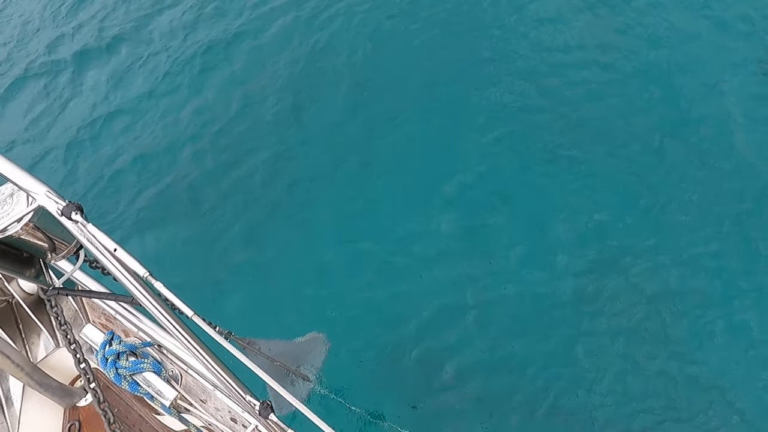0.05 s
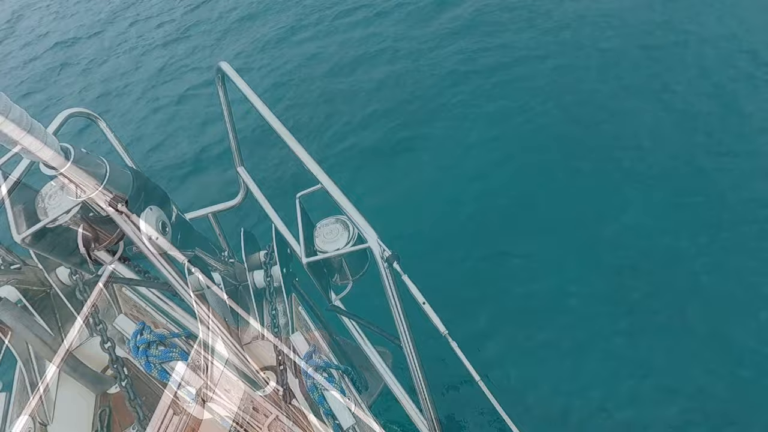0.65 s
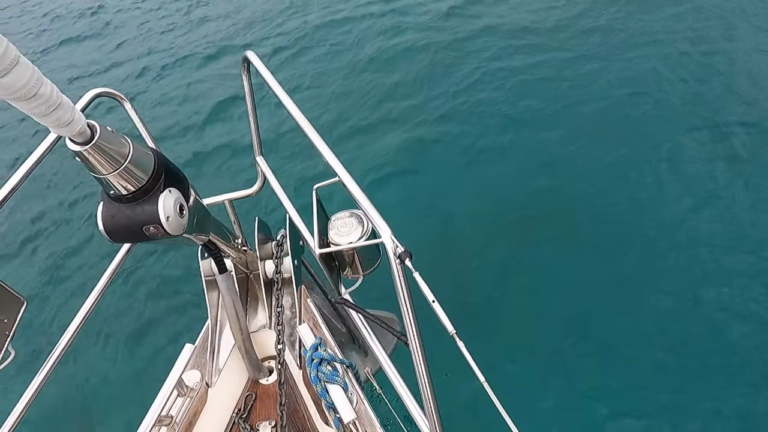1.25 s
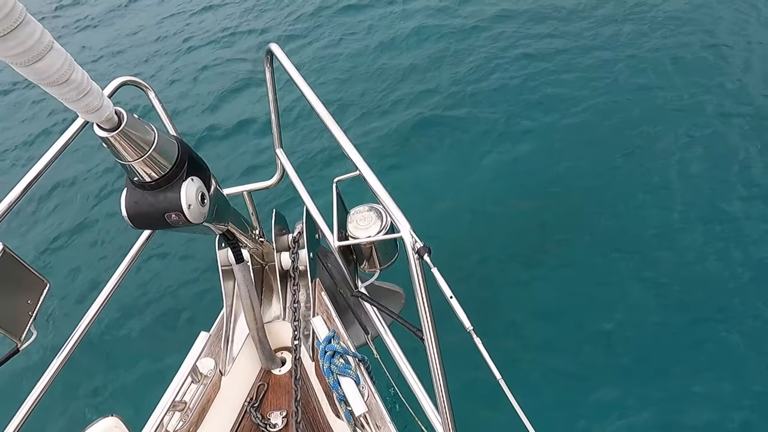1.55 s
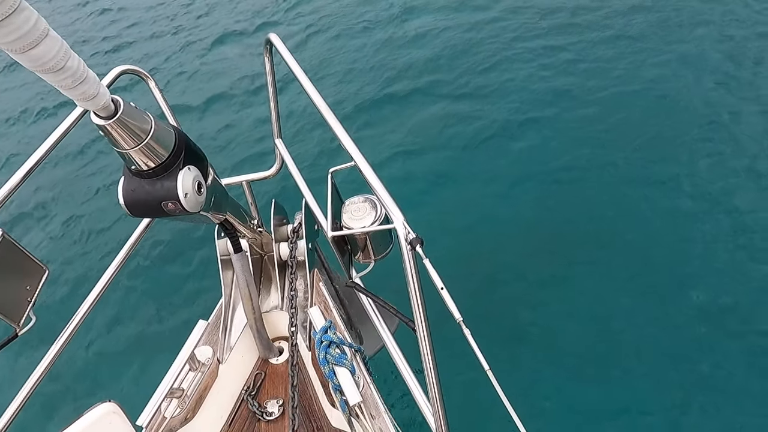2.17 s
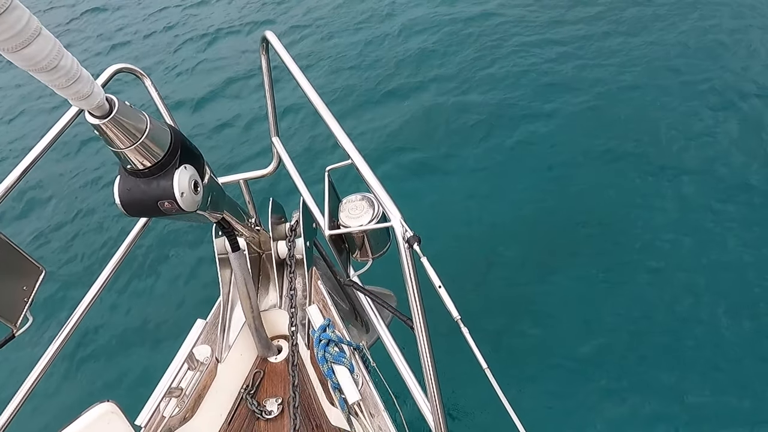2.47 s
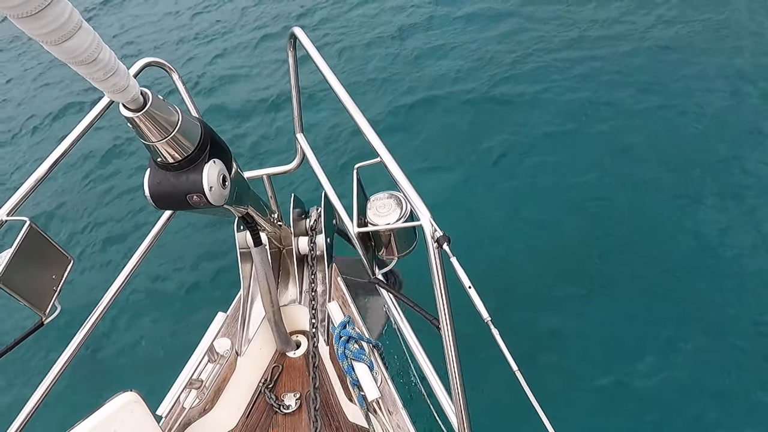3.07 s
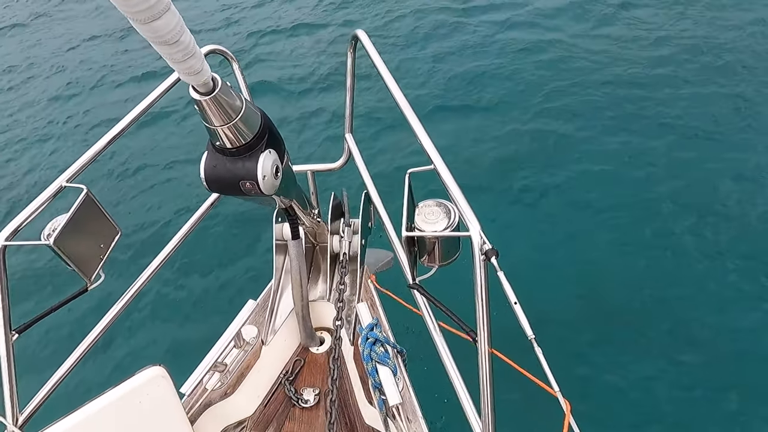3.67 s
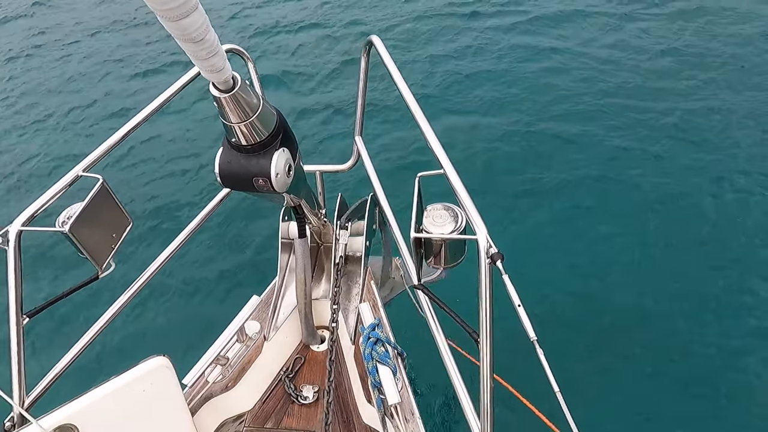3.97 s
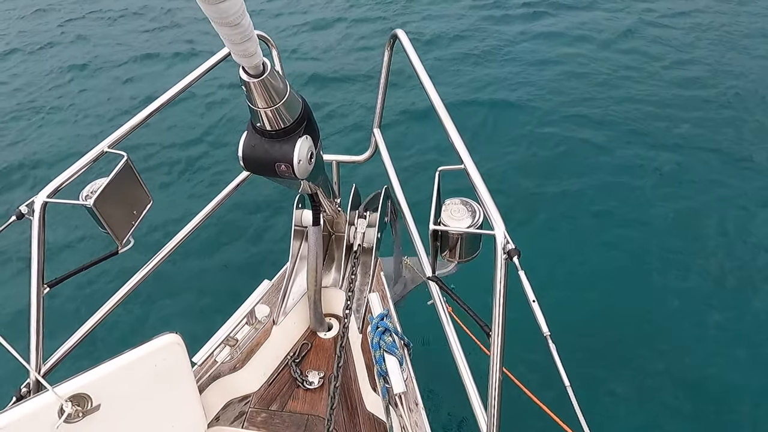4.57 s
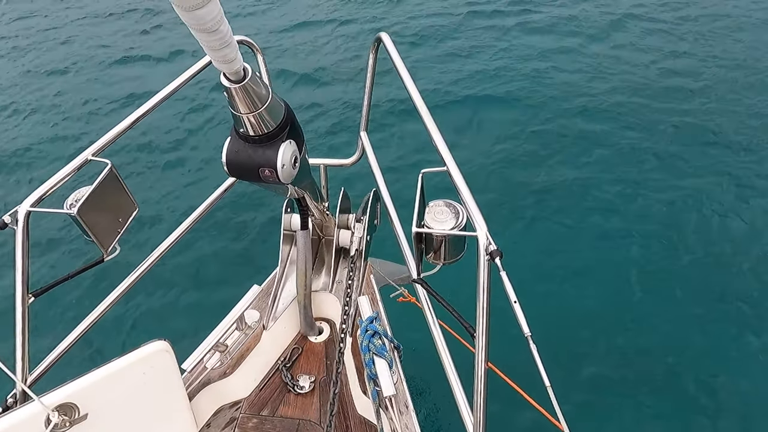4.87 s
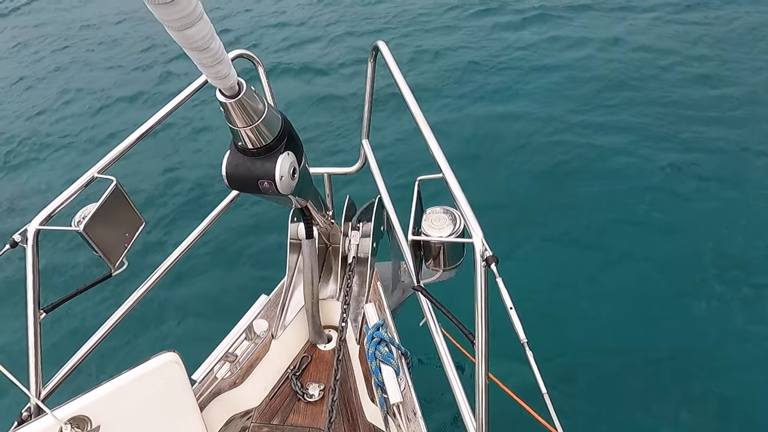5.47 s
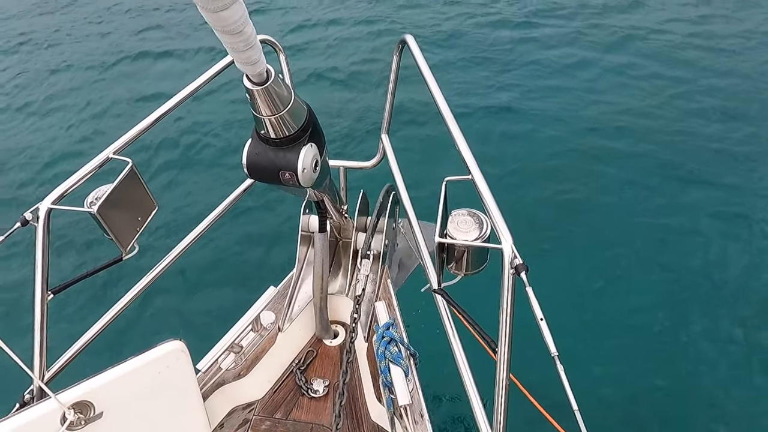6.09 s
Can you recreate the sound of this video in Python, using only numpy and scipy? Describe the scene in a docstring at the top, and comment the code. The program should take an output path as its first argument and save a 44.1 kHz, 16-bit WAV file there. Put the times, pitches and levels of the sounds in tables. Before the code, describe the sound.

An electric winch on a sailboat hauls up anchor chain in three pulls, heard close up outdoors. The first is a steady grinding rattle over a low hum, ending in ringing knocks. The second starts with a brief whine and brings loud steel clanks, a scrape and a hollow boom. The third is lighter clinking with a final knock. Gentle wind on the microphone, water and a few drips and squeaks fill the gaps.

```python
"""A chain rattles and clinks over a yacht's bow roller as an electric winch hauls it up in three pulls.
The motor hums, and whines when it restarts. Steel links grind and knock against each other.
The anchor swings, rings like a bell and clunks into its steel fitting, and the hollow deck booms.
Wind, rippling water and a few drips and squeaks fill the pauses."""
import sys
import numpy as np
from scipy import signal
from scipy.fft import rfft, irfft, next_fast_len
from scipy.io import wavfile

SR = 44100
rng = np.random.default_rng(int(sys.argv[2]) if len(sys.argv) > 2 else 0)


def digitize_waveform(pressure):
    """Quantize a signal to 16-bit integers and store it at the path in sys.argv[1].

    Rows of a 2-D input are taken as channels; values are limited to [-1, 1].
    """
    field = np.atleast_2d(pressure).T
    bounded = np.clip(field, -1, 1)
    quanta = np.round(bounded * 32767).astype(np.int16)
    wavfile.write(sys.argv[1], SR, quanta)


N = 279285
TIME = np.arange(N) / SR


def from_db(db):
    """Turn decibels into a gain."""
    return 10 ** (np.asarray(db) / 20)


def unit_power(x):
    """Scale a signal to an average power of 1."""
    return x / np.sqrt(np.mean(x ** 2) + 1e-20)


def in_time(rows):
    """Join rows that start with a time by straight lines, one curve for each further column."""
    s, *columns = np.transpose(rows)
    return [np.interp(TIME, s, column) for column in columns]


def drift(per_s):
    """A random wobble of about size 1 that turns per_s times a second."""
    knots = rng.standard_normal(N // 20)
    return unit_power(np.interp(TIME * per_s, np.arange(len(knots)), knots))


def cut(x, order, hz, kind):
    """Keep the "low" or the "high" pitches, or remove a band with "bandstop"."""
    return signal.sosfilt(signal.butter(order, hz, kind, fs=SR, output="sos"), x)


def colour(x, spectrum):
    """Give a sound the tone of a spectrum table; white noise keeps its power."""
    size = 2 * next_fast_len(N // 2 + SR // 10)
    hz, db = np.transpose(spectrum)
    log_hz = np.log(np.fft.rfftfreq(size, 1 / SR) + 1)
    gain = unit_power(from_db(np.interp(log_hz, np.log(hz), db)))
    # minimum phase: nothing sounds ahead of the hit that causes it
    cepstrum = irfft(np.log(gain))
    cepstrum[1:size // 2] *= 2
    cepstrum[size // 2 + 1:] = 0
    return irfft(rfft(x, size) * np.exp(rfft(cepstrum)))[:N]


def taps(times, db):
    """One click for each contact."""
    out = np.zeros(N)
    out[np.clip(np.round(times * SR).astype(int), 0, N - 1)] = from_db(db)
    return out


def grains(per_s, spread_db):
    """Tiny clicks at random times and of uneven strength."""
    sizes = from_db(spread_db * np.minimum(rng.exponential(1, N), 3)) * rng.choice([-1, 1], N)
    return unit_power(sizes * (rng.random(N) < per_s / SR))


def ring(force, modes):
    """A struck body rings at its own pitches (modes); each fades 60 dB in its ring time, t60."""
    out = np.zeros(N)
    for k, (hz, db, t60) in enumerate(modes):
        decay, angle = from_db(-60 / (t60 * SR)), 2 * np.pi * hz / SR
        feedback = [1, -2 * decay * np.cos(angle), decay * decay]
        out += (-1) ** k * from_db(db) * signal.lfilter([0, np.sin(angle)], feedback, force + 1e-18)
    return out


def ring_anywhere(force, modes, spot_db=5):
    """Each contact lands on another spot, which favours other modes."""
    return sum((-1) ** k * ring(force * from_db(spot_db * drift(25).clip(-2, 2)), [mode])
               for k, mode in enumerate(modes))


def burst(clicks, crack_t60, tail_t60, tail_db):
    """Countless crowded modes blur into noise: a short crack and a longer tail after each click."""
    def fade(t60):
        return signal.lfilter([1], [1, -from_db(-120 / (t60 * SR))], clicks ** 2 + 1e-18)
    power = fade(crack_t60) + from_db(tail_db) ** 2 * fade(tail_t60)
    return np.sqrt(power) * rng.standard_normal(N)


# The tone of the ripples. Each row: frequency in Hz, relative level in dB.
RIPPLE_SPECTRUM = [(300, 7), (1500, -3), (3000, -10), (7000, -27.5), (10000, -54)]
# Water along the hull. Each row: time in seconds, level in dB.
WASH = [(1.7, -50), (2.7, -48), (4.4, -55), (5.5, -50.5)]


def water():
    """Countless tiny ripples merge into a soft wash."""
    wash_db, = in_time(WASH)
    level = from_db(wash_db + 0.37 * drift(10))
    return level * colour(grains(per_s=9000, spread_db=4), RIPPLE_SPECTRUM)


# The tone of the wind. Each row: frequency in Hz, relative level in dB.
WIND_SPECTRUM = [(20, -23.5), (55, 0), (90, -2.5), (190, -1), (350, -9), (640, -18.5), (1000, -36.5),
                 (3000, -78)]
# Gusts on top of the breeze. Each row: middle in seconds, half-width in seconds, boost in dB.
GUSTS = [(1.7, 0.35, 7.5), (2.68, 0.16, 9), (3.899, 0.19, 6.5), (5.48, 0.52, 7.5), (6.1, 0.18, 5.5)]


def wind(breeze_db=-41, arrives_s=1.44, rise_s=0.39):
    """A breeze picks up and buffets the microphone in lumps and gusts."""
    gust_db = sum(db * np.exp(-((TIME - s) / width_s) ** 2) for s, width_s, db in GUSTS)
    picked_up = .5 + .5 * np.tanh((TIME - arrives_s) / rise_s)
    lumps_db = 2 * drift(30)
    rush = colour(rng.standard_normal(N), WIND_SPECTRUM)
    return picked_up * from_db(breeze_db + gust_db + lumps_db) * rush


# Drips off the anchor and small squeaks. Each row: start in seconds, level in dB,
# first pitch in Hz, glide in Hz per second, ring time in seconds.
PLINKS = [(1.669, -28.5, 1180, 54987, 0.028), (1.826, -44, 12000, 1, 0.029),
          (1.878, -16, 3250, 3012, 0.009), (4.472, -38.5, 2140, 2506, 0.14),
          (4.535, -24.5, 2780, 499, 0.043), (5.789, -19.5, 9250, -2000, 0.034)]


def drips_and_squeaks():
    """Short gliding tones, a little unsteady, that swell quickly and die away."""
    waver = 1 + .02 * drift(500)
    out = np.zeros(N)
    for s, db, hz, glide, t60 in PLINKS:
        age = np.clip(TIME - s, 0, .5)
        phase = 2 * np.pi * np.cumsum((hz + glide * age) * waver) / SR
        attack = 1 - np.exp(-age / .005)
        out += attack * from_db(db - 60 * age / t60) * np.sin(phase)
    return out


# The motor's hum. Each row: time in seconds, pitch in Hz, level in dB.
HUM = [(0, 84, -37), (.28, 88.5, -36.5), (.7, 84.4, -39), (1.3, 85, -58)]


def motor_hum():
    """The motor hums low under load, wavering in level and pitch."""
    hz, db = in_time(HUM)
    level = np.sqrt(2) * from_db(db + 1.6 * drift(14))
    return level * np.sin(2 * np.pi * np.cumsum(hz + drift(8.8)) / SR)


# The motor spinning up. Each row: start in seconds, peak level in dB.
MOTOR_STARTS = [(3.004, -20), (5.756, -23.5)]


def gear_whine(top_hz=1470, rise_s=0.047, loudest_s=0.042):
    """The gears' whine climbs towards full speed until the chain takes up the load."""
    out = np.zeros(N)
    for s, db in MOTOR_STARTS:
        age = np.maximum(TIME - s, 0)
        hz = top_hz * (1 - np.exp(-age / rise_s)) * (1 + 0.092 * drift(300))
        swell = (age / loudest_s) ** 2
        out += from_db(db) * swell * np.exp(1 - swell) * np.sin(2 * np.pi * np.cumsum(hz) / SR)
    return out


# A side plate of the roller. Each row: pitch in Hz, relative level in dB, ring time in seconds.
PLATE_MODES = [(2050, -2, 0.26), (2160, -13, .36)]
# The anchor's shank (its long bar) dragging. Each row: start and stop in seconds, level in dB.
DRAGS = [(3.15, 3.358, -32), (3.474, 3.673, -21.5)]


def singing_plate():
    """The shank rubs over the roller and makes a side plate sing."""
    out = np.zeros(N)
    for start, stop, db in DRAGS:
        friction = grains(per_s=570, spread_db=-2.0) * (TIME > start) * (TIME < stop)
        for hz, mode_db, t60 in PLATE_MODES:
            tone = ring(friction, [(hz, 0, t60)])
            out += from_db(db + mode_db) * tone / np.abs(tone).max()
    return out


# The steel bow fitting. Each row: pitch in Hz, relative level in dB, ring time in seconds.
FITTING_MODES = [(1270, -9, 0.6), (1523, -7, 0.55), (1674, -10.5, 0.7), (1922, -4, 0.38), (1960, 3, 0.24),
                 (2008, -1, 0.35), (2396, -6, .34), (2541, -10, 0.58), (2682, -5, 0.33), (2918, -8, 0.3),
                 (3790, -12, 0.22), (4000, -13, .28), (4134, -12, 0.26), (4436, -14, .23)]


def bow_fitting(force, seated_s=2, chain_only_db=-8):
    """The fitting rings when knocked, more softly until the shank rests on it."""
    contact = from_db(np.where(TIME > seated_s, 0, chain_only_db))
    return from_db(-15.5) * ring(contact * force, FITTING_MODES)


# The anchor. Each row: pitch in Hz, relative level in dB, ring time in seconds.
ANCHOR_MODES = [(1190, 0, 0.8), (1316, -1, 0.42), (1690, -9, 0.35), (2541, -8, 0.5), (3012, -8, 0.42),
                (4145, -19, 0.9), (4732, -22, .45)]
# Blows on the anchor. Each row: start in seconds, level in dB, pitch in Hz above which little rings.
TOLLS = [(0.984, -28, 2800), (1.0174, -20.5, 5000), (1.2992, -24.5, 5100), (2.0842, -39.5, 2930)]


def anchor_tolls():
    """The hanging anchor rings like a bell; a soft blow leaves its high modes still."""
    out = np.zeros(N)
    for s, db, top_hz in TOLLS:
        modes = [(hz, mode_db - 10 * np.log10(1 + (hz / top_hz) ** 10), t60)
                 for hz, mode_db, t60 in ANCHOR_MODES]
        out += ring(taps(np.array([s]), db), modes)
    return out


# The tones of a bright snap, a clack and a low thud. Each row: frequency in Hz, relative level in dB.
SNAP_SPECTRUM = [(800, -14), (2000, 6.5), (4000, 3.5), (5500, -3.5), (7500, -17), (10200, -32.5),
                 (12000, -36.5), (15000, -63)]
CLACK_SPECTRUM = [(150, -20.5), (500, -2.5), (950, 7), (2000, 0), (3000, -8), (5000, -28), (9000, -64)]
THUD_SPECTRUM = [(40, -40), (100, -11), (170, 2.5), (380, 6), (550, -4), (900, -7.5), (2000, -53.5),
                 (6000, -81.5)]
# Three hollow bodies. Each row: pitch in Hz, relative level in dB, ring time in seconds.
DECK_MODES = [(181.6, 2.4, 0.28), (250.3, 4, 0.21), (377.6, 1.34, 0.086)]
ROLLER_MODES = [(294, -5, 0.18), (401.8, 1, 0.15), (482.4, -6.5, 0.24), (597.7, -0.5, 0.16),
                (660, 0.5, 0.16)]
HULL_MODES = [(142.1, -5.5, 0.29), (183.9, 0.5, 0.38), (241.8, -1, 0.25), (373, -24.5, 2.35)]
# The anchor's full weight landing. Each row: start in seconds, level in dB.
SLAMS = [(2.085, -24.5), (3.873, -9)]
# Anchor and taut chain hitting the fitting. Each row: start in seconds, level in dB,
# hardness (extra snap) in dB, weight (extra thud) in dB.
KNOCKS = [(1.2877, -21.5, -12, -4), (1.301, -13, -13, -1), (1.4405, -25, -6, -5), (1.8588, -31, -20, 0.5),
          (2.0831, -30.5, -11, 5.5), (2.999, -26.5, 5.5, -8), (3.074, -13, 0, 3), (3.1226, -20, 5.5, 8.5),
          (3.175, -11, -3.5, -12), (3.257, -15, 0.5, -19), (3.281, -16.5, 2.5, -27),
          (3.4755, -16, -5.5, -16), (3.6312, -18, 1.5, -5.5), (3.76, -33, 2, -16), (3.872, -15, -3.5, 5),
          (3.966, -22, -4.5, -12), (4.0662, -21.5, -6.5, -28.5), (4.534, -44, -3, -3.5),
          (4.9929, -23, -6, -6.5), (5.042, -20, -6, -9.5), (5.099, -27, -10.5, -12),
          (5.7369, -22.5, -18, -32), (5.8317, -18.5, -26, -8), (6.309, -16.5, -1.5, -6)]


def knocks(heavy_db=-22, rebound_s=.014, rebound_loss_db=8.5):
    """Heavy steel hits the fitting and the deck booms; returns the sound and the force on the steel."""
    s, db, hardness_db, weight_db = np.transpose(KNOCKS)
    thud_db = db + weight_db
    heavy = thud_db > heavy_db

    def bouncing(level):  # heavy blows bounce and strike once more
        return taps(s, level) + taps(s[heavy] + rebound_s, level[heavy] - rebound_loss_db)

    snap = burst(bouncing(db + hardness_db - 0.5), crack_t60=0.021, tail_t60=0.098, tail_db=-3.5)
    clack = burst(bouncing(db - 2), crack_t60=0.07, tail_t60=0.19, tail_db=-4)
    thud = burst(taps(s, thud_db - 3.5), crack_t60=0.28, tail_t60=0.59, tail_db=-4.5)
    impact = colour(snap, SNAP_SPECTRUM) + colour(clack, CLACK_SPECTRUM) + colour(thud, THUD_SPECTRUM)
    deck_boom = from_db(-8.5) * ring(taps(s, thud_db), DECK_MODES + ROLLER_MODES)
    hull_boom = ring(taps(*np.transpose(SLAMS)), HULL_MODES)
    # part of a blow's extra weight also goes into the steel
    force = taps(s, db + 0.35 * np.maximum(weight_db, 0))
    return impact + deck_boom + hull_boom, force


# Stretches of moving chain. Each row: start and stop in seconds, rattle level in dB,
# build-up time in seconds, seconds per link, extra deck rumble in dB.
RUNS = [(0, 1.189, -23, 0.00043, 0.12, 2.5), (2.987, 3.28, -18, 0.2, .15, 3),
        (3.425, 3.549, -24, 0.045, 0.16, 5.5), (3.755, 3.807, -34, .002, 0.16, 3),
        (5.729, 5.88, -34, 0.0064, 0.13, 8), (5.917, 6.336, -27, 0.0087, .175, -1)]
FIRST_LINK_S = 0.032  # from the start of a run until a link crosses the roller


def haul(link_swell_db=0.63, coast_db_per_s=91.5):
    """Each run builds up, throbs link by link and coasts to rest; returns rattle and rumble strength."""
    rattle, rumble = np.zeros(N), np.zeros(N)
    # the chain grinds harder as the anchor comes up to the roller
    arrival_db = 1.5 * np.exp(-((TIME - 0.984) / 0.19) ** 2)
    for start, stop, db, build_s, link_s, rumble_db in RUNS:
        age = np.maximum(TIME - start, 0)
        swell_db = link_swell_db * np.cos(2 * np.pi * (age - FIRST_LINK_S) / link_s)
        coast_db = coast_db_per_s * np.maximum(TIME - stop, 0)
        run = (1 - np.exp(-age / build_s)) * from_db(db + swell_db + arrival_db - coast_db)
        rattle += run
        rumble += run * from_db(rumble_db)
    return rattle, rumble


def passing_links(drop_db=-4.5):
    """One tap for every link that crosses the roller, gentler while the run builds up."""
    force = np.zeros(N)
    for start, stop, db, build_s, link_s, _ in RUNS:
        times = np.arange(start + FIRST_LINK_S, stop, link_s)
        build_db = 20 * np.log10(1 - np.exp(-(times - start) / build_s))
        force += taps(times, db + drop_db + build_db)
    return force


def struck(rows, cycles, spread, others_db, count=8):
    """Each hit rings one main pitch in a random cluster, fading 60 dB over so many cycles."""
    out = np.zeros(N)
    for s, db, hz in rows:
        start = int(s * SR)
        age = TIME[:N - start][:SR // 3]
        offsets, sizes = rng.standard_normal((2, count))
        pitches = hz * np.exp(spread * offsets)
        others = sizes @ np.sin(2 * np.pi * np.outer(pitches, age)) / np.sqrt(count)
        modes = np.sin(2 * np.pi * hz * age) + from_db(others_db) * others
        attack = 1 - np.exp(-2 * age * hz)  # low rings take longer to build up
        out[start:start + len(age)] += attack * from_db(db - 60 * age * hz / cycles) * modes
    return out


# One chain link. Each row: pitch in Hz, relative level in dB, ring time in seconds.
LINK_MODES = [(2560, -17.5, 0.14), (2950, -10, 0.3), (3324, -3.5, 0.22), (3470, -1.5, 0.13),
              (4236, -3, 0.16), (4704, -1, 0.11), (6858, -6.5, 0.07)]
# The sharpest snaps of single links. Each row: start in seconds, relative level in dB, pitch in Hz.
CLINKS = [(0.0161, -17, 3310), (0.082, -24.5, 4220), (0.1195, -17.5, 4670), (0.1505, -13, 3235),
          (0.2595, -16, 4220), (0.3433, -22.5, 4360), (0.389, -30, 3280), (0.5524, -19, 3330),
          (0.6621, -16, 4710), (0.722, -24, 3240), (0.8326, -17, 3590), (0.857, -20, 3260),
          (0.9697, -13, 4640), (0.984, -13, 3190), (1.016, -25, 3200), (1.078, -20, 2910),
          (1.139, -17.5, 4600), (1.44, -26.5, 4730), (1.9888, -39.5, 3360), (2.972, -46, 4960),
          (3.1453, -16, 2550), (3.3156, -14.5, 3550), (3.428, -18.5, 3220), (3.4578, -21.5, 3560),
          (3.6306, -18.5, 3420), (3.8974, -20.5, 3150), (3.9428, -22.5, 2990), (4.009, -25, 4120),
          (4.17, -33, 4180), (4.416, -48.5, 2920), (5.628, -50, 4330), (5.753, -23, 2546),
          (5.9238, -15.5, 4700), (5.955, -23, 2940), (6.0723, -17, 4800), (6.0971, -12.5, 4720),
          (6.2104, -21.5, 4220), (6.242, -19, 4700)]


def clinks():
    """A link drops against its neighbour and rings briefly; returns the sound and the force."""
    s, db, _ = np.transpose(CLINKS)
    force = taps(s, db)
    snap = burst(from_db(-2.5) * force, crack_t60=0.025, tail_t60=0.32, tail_db=-10.5)
    tone = from_db(-5.0) * struck(CLINKS, cycles=300, spread=.14, others_db=-4.0)
    tone += from_db(-17.5) * ring_anywhere(force, LINK_MODES)
    return colour(snap, SNAP_SPECTRUM) + tone, force


# The heaviest drops onto the roller. Each row: start in seconds, level in dB, pitch in Hz.
CLONKS = [(.033, -16, 469), (.172, -16, 412), (.735, -19, 344), (1.2886, -17, 917), (2.0615, -26, 2090),
          (3.1224, -18, 361), (3.175, -14.5, 293), (3.4765, -18, 1960), (4.067, -17.5, 2910),
          (4.9935, -18.5, 1023), (5.0425, -20, 1046), (5.0425, -17.5, 2990), (6.103, -22, 647),
          (6.134, -22, 437)]


def clonks():
    """Links and shank drop onto the hollow roller with a knock that carries little bass."""
    heavy = struck(CLONKS, cycles=77, spread=0.167, others_db=1.0)
    regular = ring_anywhere(passing_links(), ROLLER_MODES)
    return cut(heavy + regular, 2, 220, "high")


def jangle(per_s, t60, spread_db, count=112):
    """Many links, each with steady pitches of its own, are struck at random."""
    pitches = np.geomspace(500, 12500, count) * np.exp(.02 * rng.standard_normal(count))
    hits = np.flatnonzero(rng.random(N) < per_s / SR)
    sizes = rng.standard_normal((count, N // 40))[:, :len(hits)]
    force_db = spread_db * rng.standard_normal(N)[hits].clip(-2, 2)
    out = np.zeros(N)
    for k, (hz, size) in enumerate(zip(pitches, sizes)):
        # one contact strikes all the pitches at once, a few of them hard
        force = taps(hits / SR, force_db + 7 * size.clip(-2, 2))
        damping = 1 + (hz / 5000) ** 2  # the highest pitches die soonest
        balance = np.sqrt(hz * damping)  # keeps the power even from low to high
        out += (-1) ** k * balance * ring(force, [(hz, 0, t60 / damping)])
    return unit_power(out)


# The tone of the rumbling deck. Each row: frequency in Hz, relative level in dB.
RUMBLE_SPECTRUM = [(55, -55), (110, -2), (230, -1.5), (370, 5.5), (500, -0.5), (700, -8), (1100, -3.5),
                   (3000, -84)]


def deck_rumble(strength):
    """The moving chain bumps the roller and deck panels; the rumble carries no deep bass."""
    bumps = strength * grains(per_s=700, spread_db=3.5)
    rumble = from_db(-5.0) * colour(bumps, RUMBLE_SPECTRUM)
    panels = from_db(-43.5) * ring(bumps, DECK_MODES)
    roller = from_db(-45.0) * ring_anywhere(bumps, ROLLER_MODES)
    return cut(rumble + panels + roller, 2, 90, "high")


# The tone of the rattling chain. Each row: frequency in Hz, relative level in dB.
RATTLE_SPECTRUM = [(300, -9.5), (700, 7.5), (1000, 5), (2000, 3), (2900, -3.5), (5200, -10), (7500, -26),
                   (10500, -40.5), (15000, -87.5)]


def chain_rattle(strength):
    """Links tumble over the roller and winch wheel; returns the sound and the force on the steel."""
    contacts = grains(per_s=560, spread_db=2.0)
    scrape = from_db(-8.5) * unit_power(burst(contacts, crack_t60=.008, tail_t60=0.043, tail_db=0))
    jangling = from_db(-3.5) * jangle(per_s=75, t60=0.13, spread_db=2.5)
    grinding = colour(strength * (scrape + jangling), RATTLE_SPECTRUM)
    # a few contacts are steel edge on steel edge: separate bright chinks
    edges = strength * grains(per_s=26, spread_db=2.0)
    chinks = burst(from_db(-37) * edges, crack_t60=.014, tail_t60=0.051, tail_db=-12)
    # the rest are rounded and pass on little treble
    shaking = cut(strength * contacts + 1e-18, 4, 5800, "low")
    ringing = from_db(-48.0) * ring_anywhere(shaking, LINK_MODES)
    return grinding + colour(chinks, SNAP_SPECTRUM) + ringing, shaking


def scene():
    """Everything on the open front deck, close by, in one channel."""
    rattle_strength, rumble_strength = haul()
    rattle, shaking = chain_rattle(rattle_strength)
    rumble = deck_rumble(rumble_strength)
    blows, striking = knocks()
    clinking, tapping = clinks()
    chain = rattle + rumble + clinking + clonks()
    force = striking + from_db(-6) * tapping + from_db(-33) * shaking
    steel = anchor_tolls() + bow_fitting(force) + singing_plate()
    motor = motor_hum() + gear_whine()
    background = drips_and_squeaks() + wind() + water()
    return (chain + blows + steel + motor + background)[None]


def record(dry, ceiling=.95, notch_hz=(8300, 9600), cutoff_hz=15100):
    """The microphone has a deep notch in the treble; the loudest peaks are rounded and the top is cut."""
    rounded = dry / (1 + (dry / ceiling) ** 6) ** (1 / 6)
    notched = cut(rounded, 2, notch_hz, "bandstop")
    return signal.sosfilt(signal.cheby2(12, 60, cutoff_hz, fs=SR, output="sos"), notched)


dry = scene()
out = record(dry)
digitize_waveform(out)
```